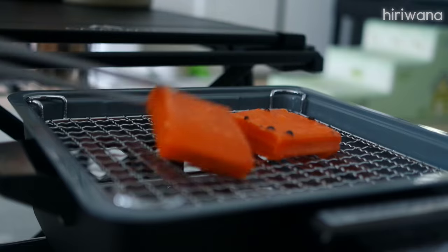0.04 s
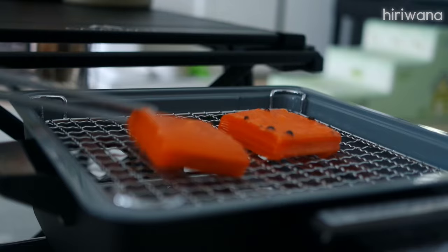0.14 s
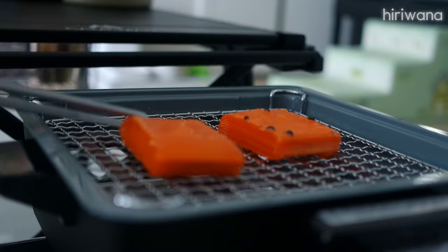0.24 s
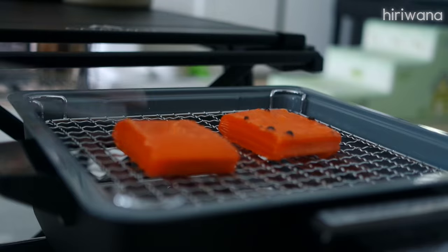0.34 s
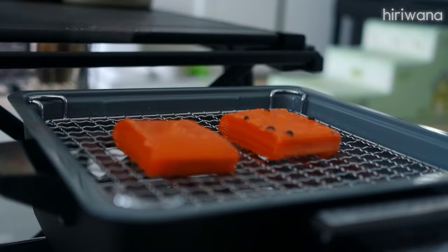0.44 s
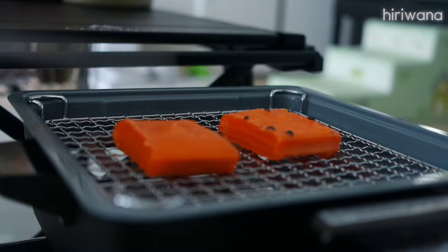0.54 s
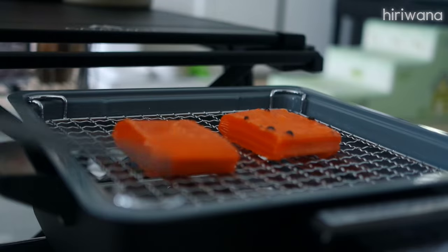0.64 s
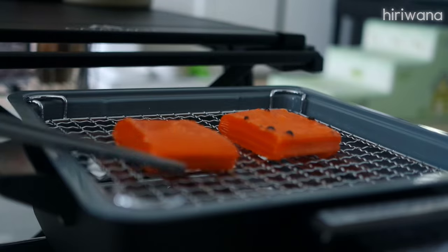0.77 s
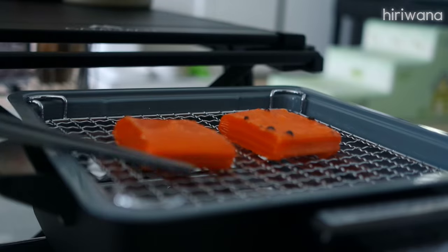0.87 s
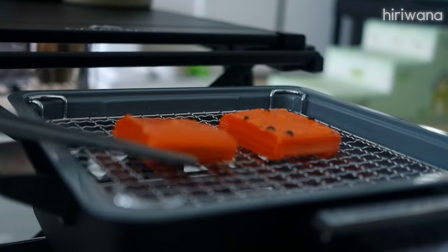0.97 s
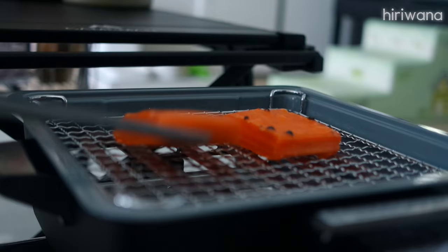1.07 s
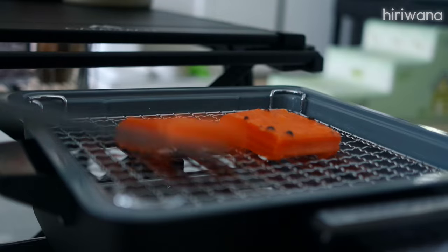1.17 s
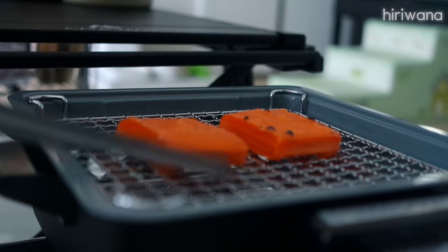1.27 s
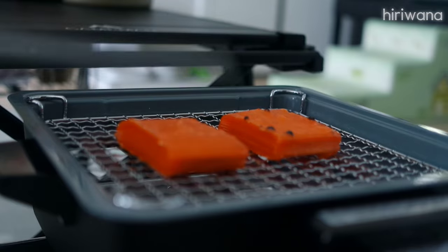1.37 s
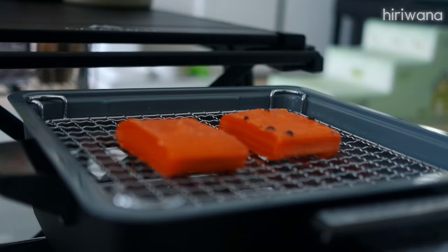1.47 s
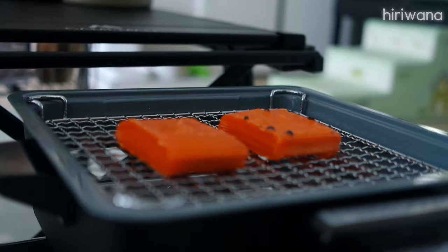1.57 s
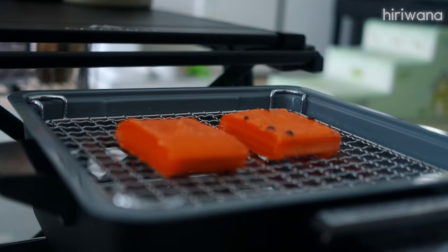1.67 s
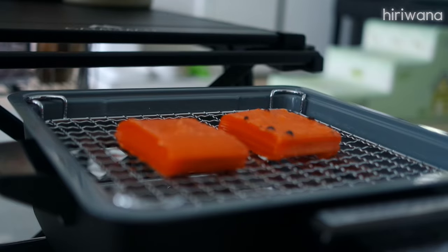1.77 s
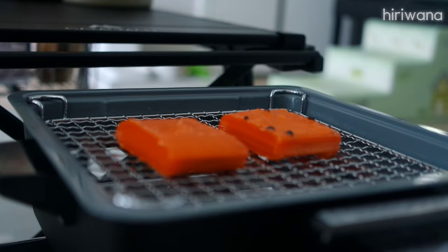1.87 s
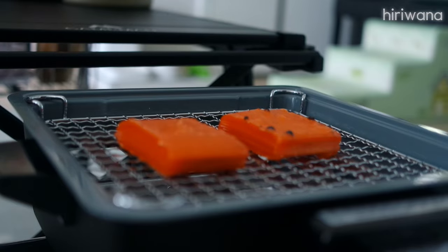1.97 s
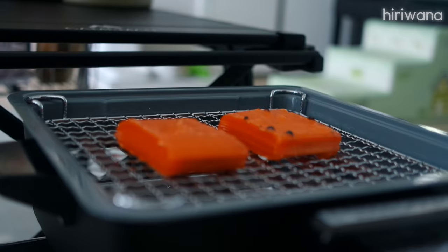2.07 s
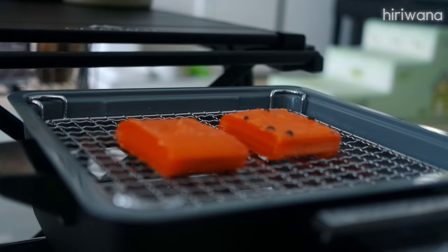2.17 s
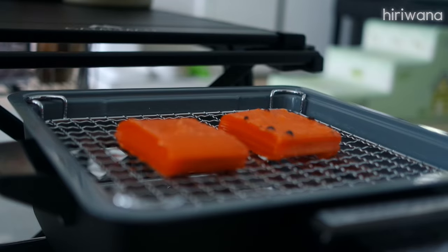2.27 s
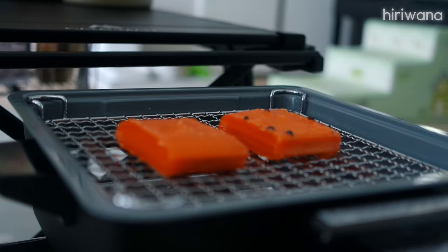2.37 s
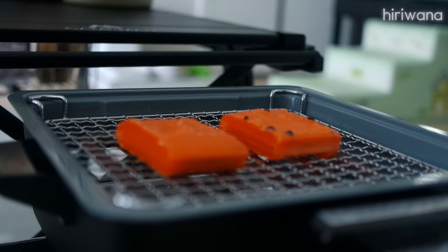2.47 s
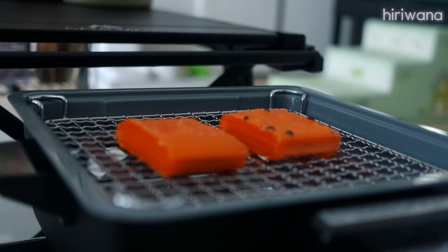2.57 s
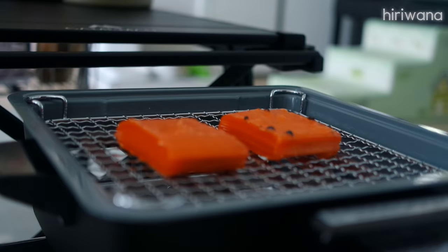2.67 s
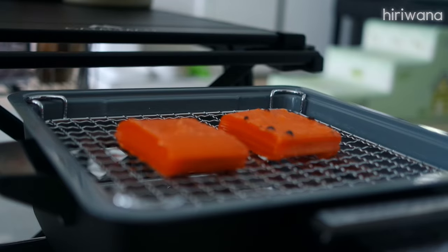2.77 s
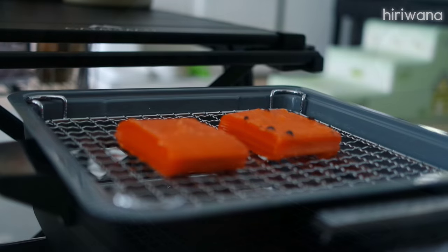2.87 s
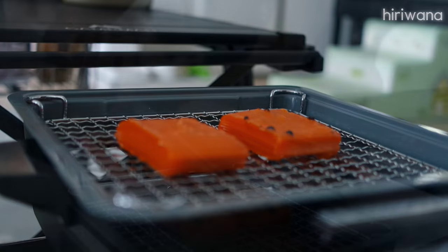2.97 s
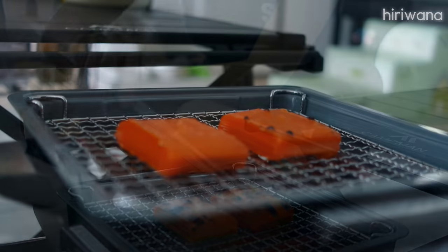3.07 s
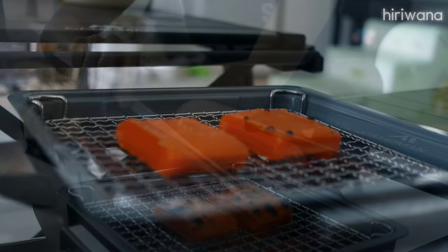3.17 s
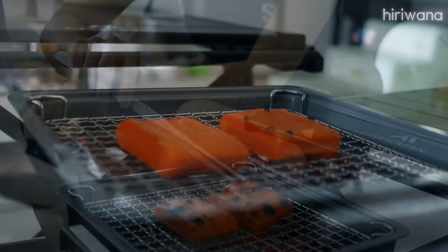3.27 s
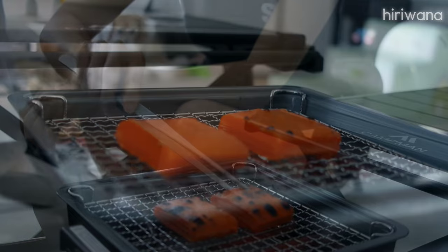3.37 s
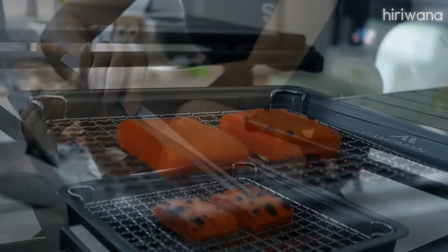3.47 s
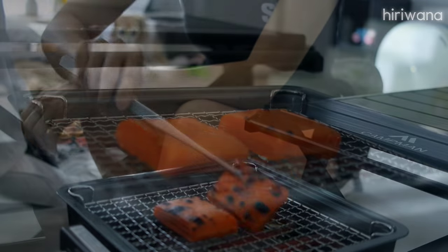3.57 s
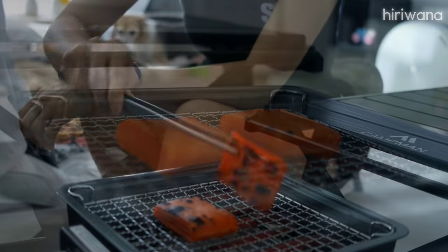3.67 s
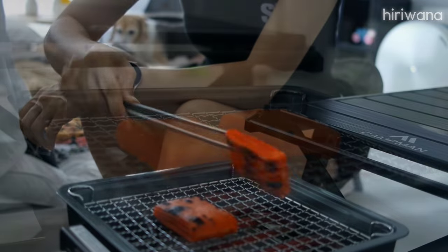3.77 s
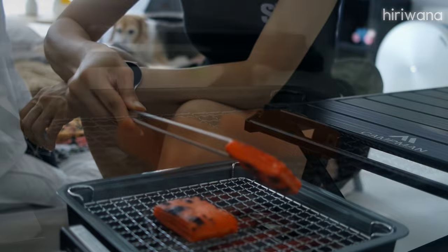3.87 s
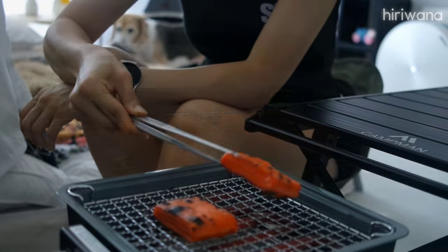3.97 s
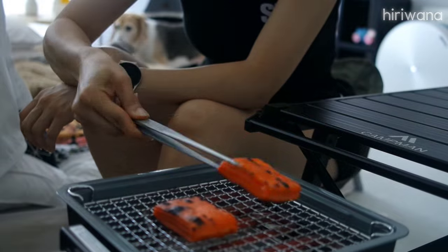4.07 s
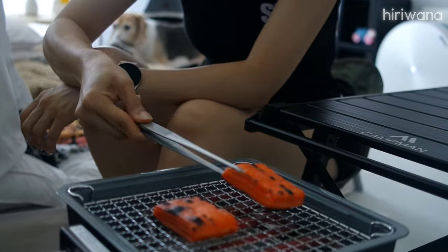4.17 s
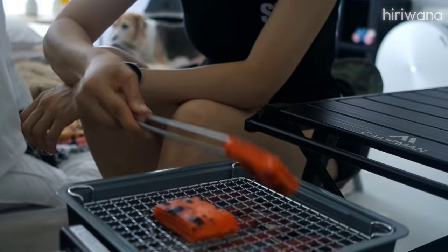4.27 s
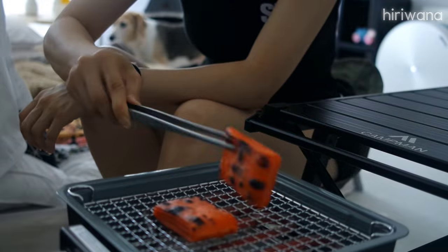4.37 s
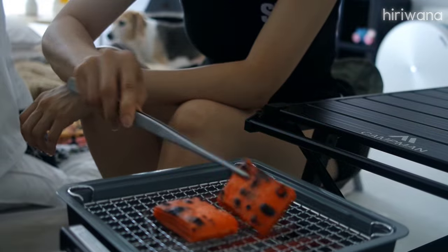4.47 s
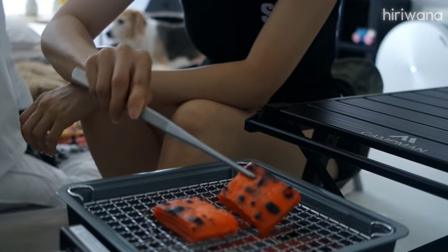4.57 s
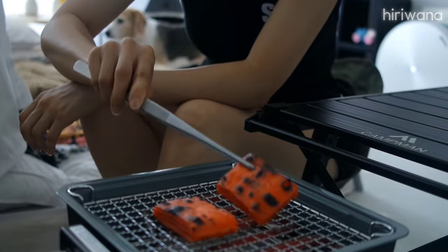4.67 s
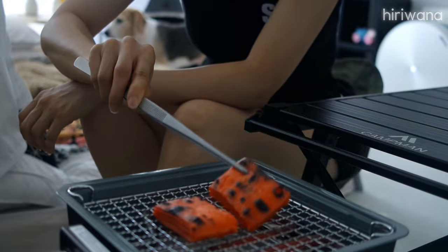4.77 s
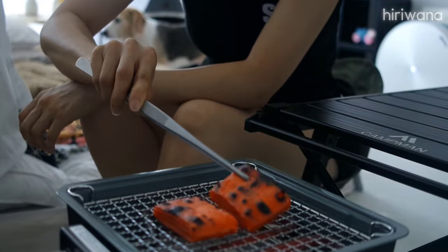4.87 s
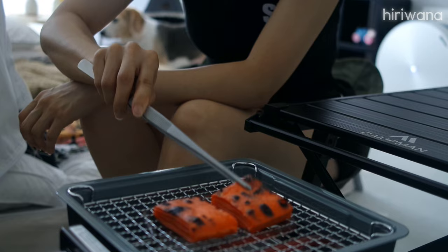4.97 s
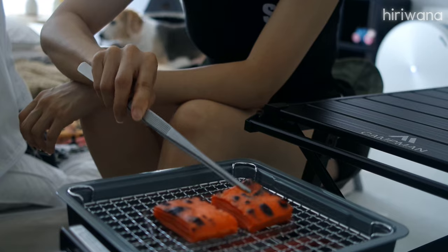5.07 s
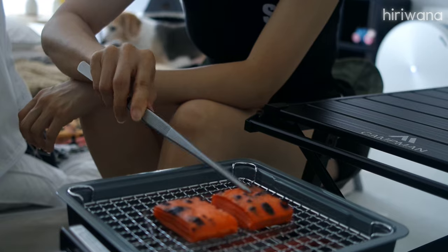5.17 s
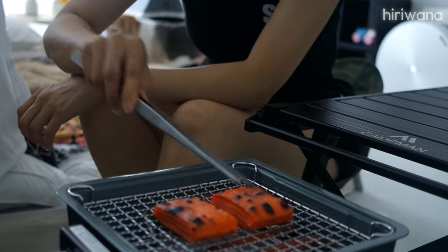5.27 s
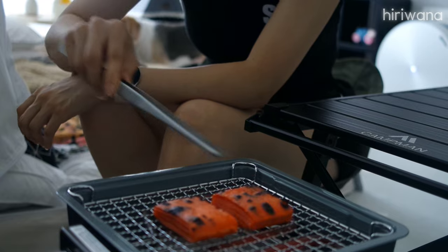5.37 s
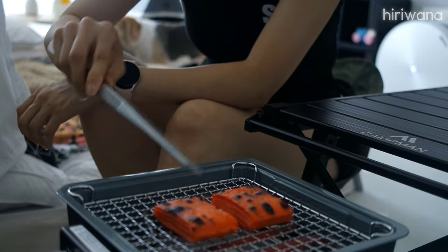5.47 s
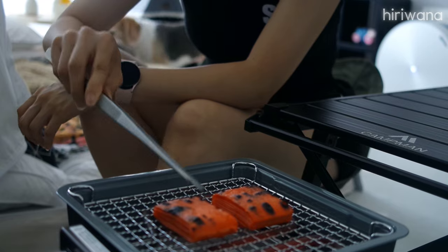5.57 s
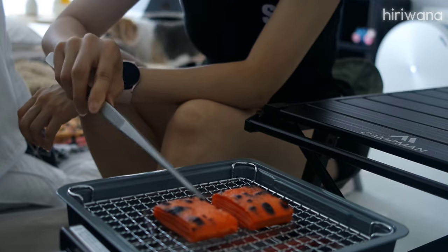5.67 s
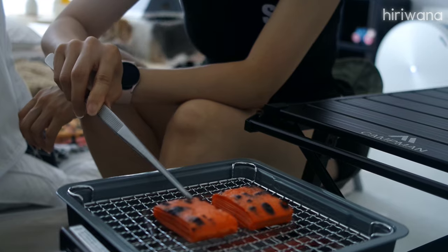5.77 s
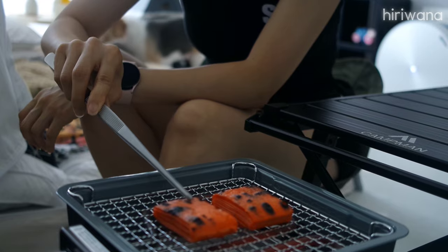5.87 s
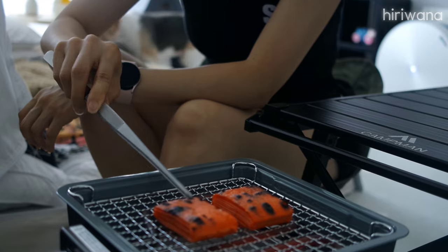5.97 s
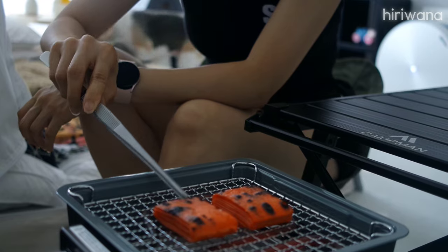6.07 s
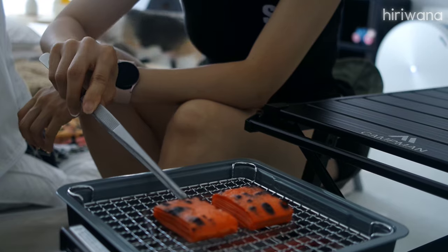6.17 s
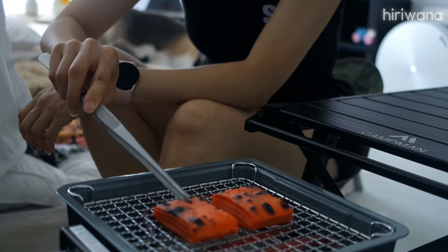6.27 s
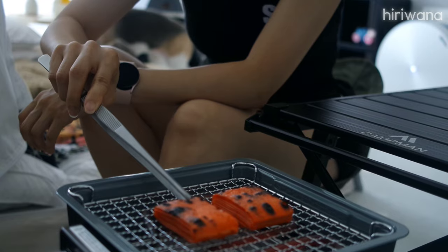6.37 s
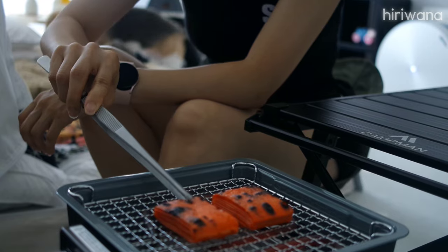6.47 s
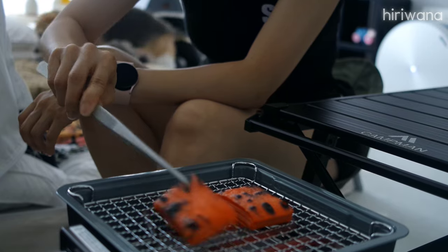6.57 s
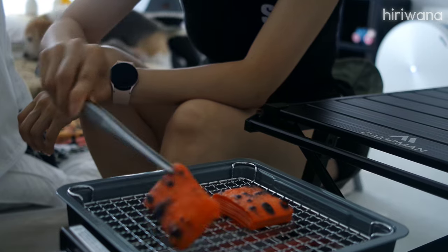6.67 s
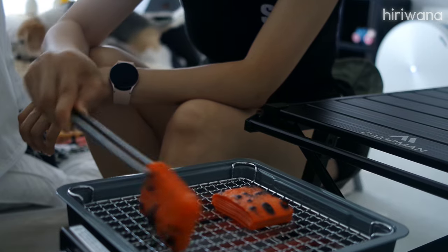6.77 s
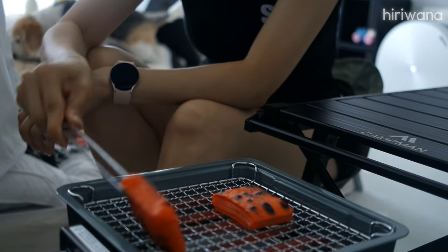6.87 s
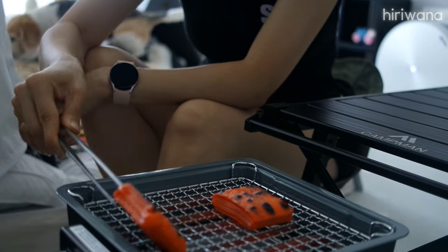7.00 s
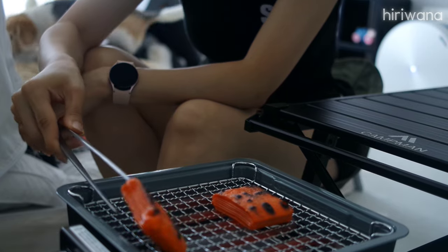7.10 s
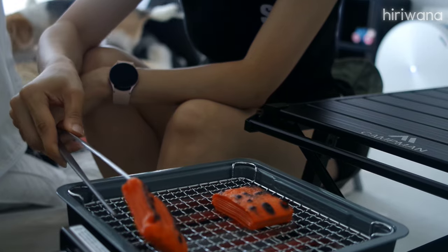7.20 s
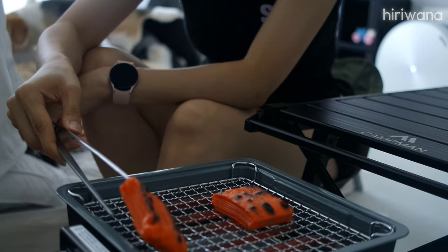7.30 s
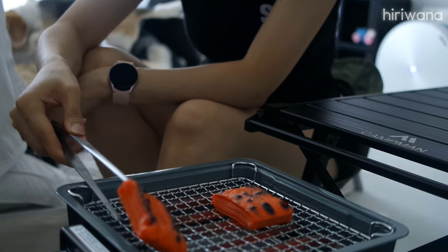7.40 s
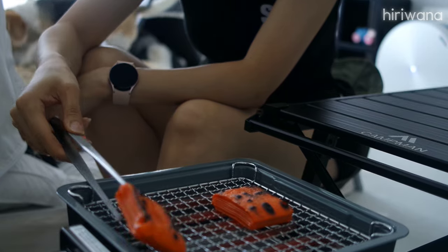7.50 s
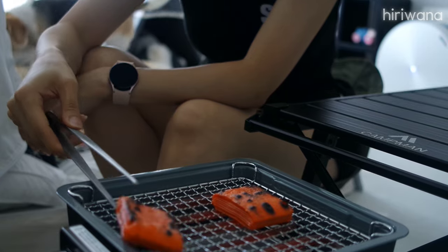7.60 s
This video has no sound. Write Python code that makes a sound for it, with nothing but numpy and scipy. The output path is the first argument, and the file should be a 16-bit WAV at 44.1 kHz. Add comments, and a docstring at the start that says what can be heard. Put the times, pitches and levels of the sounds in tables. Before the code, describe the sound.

A quiet room with faint low hum, airy hiss and very thin high whines; a small tabletop grill is close to the microphone. Barely audible tong touches come first, with soft paired treble puffs fading through the first three seconds. At 0.8 s a hard, tinny knock hits grate and tray, by far the loudest, with smaller knocks until 1.0. At 1.34 s a bright double clack rattles the wires. Only tiny ticks follow until about 3 s, when the background tone shifts. From 3.35 to 3.75 s crisp ticks and knocks cluster, the sharpest near 3.5. Sparse, light wire taps continue from 4.0 to 5.4. Thin blade clicks and pings come around 5.9-6.6, then a quick scrabble at 6.6-6.8 and a final tap at 7.62. Louder contacts briefly lift the background. Distant birds whistle faintly throughout, with quick falling chirps near 6.1-6.3 s.

```python
"""Steel tongs tick and knock on the wire grate of a small tabletop grill in a quiet room.
Knocks sum coloured noise for the rattling wires with damped modes of tin tray and wires;
ticks are noise clicks with a blade ping. Underneath lie hum, hiss and whines (noise and steady sines),
paired treble puffs (swelling noise) and birds (gliding, blurred sines).
A noise expander opens on louder contacts, lifting the whole background, then closes again."""
import sys
import numpy as np
from scipy import signal
from scipy.fft import rfft, irfft, next_fast_len
from scipy.io import wavfile
from scipy.ndimage import uniform_filter1d, map_coordinates

SR = 44100
rng = np.random.default_rng(int(sys.argv[2]) if len(sys.argv) > 2 else 0)


def pcm_store(signal):
    """Save signal as 16-bit PCM."""
    levels = np.round(np.clip(np.atleast_2d(signal), -1, 1) * 32767)
    wavfile.write(sys.argv[1], SR, levels.astype(np.int16).T)


def field_ratio(decibels):
    """Amplitude ratio for a level in dB (20 dB per decade); scalars and array-likes work."""
    return 10 ** (np.asarray(decibels, dtype=float) / 20)


N = 336924

# time over which tones, whines and bird chorus change level: start_s, end_s
CROSSFADE = (2.85, 3.4)


def along(points, hz):
    """Interpolates (Hz, value) points on a logarithmic frequency axis."""
    f, v = np.transpose(points)
    return np.interp(np.log(hz + 1), np.log(f + 1), v)


def unit(x):
    """Normalises by the root mean square, so that rms is 1."""
    return x / np.sqrt(np.mean(x ** 2) + 1e-20)


def wobble(rate):
    """Slow random modulation: a smooth curve through `rate` random knots a second."""
    knots = rng.standard_normal(int(N * rate / SR) + 4)
    return map_coordinates(knots, [np.arange(N) * rate / SR])


def noise(spectrum, n):
    """Spectral shaping: white noise weighted by (Hz, dB) points, scaled to rms 1."""
    m = next_fast_len(n)
    white = rfft(rng.standard_normal(m))
    gain = field_ratio(along(spectrum, np.fft.rfftfreq(m, 1 / SR)))
    return unit(irfft(white * gain, m)[:n])


def steady(hz, db0, db1, shake_db):
    """Pure tone with slight amplitude and phase modulation, cross-faded between two levels."""
    t = np.arange(N) / SR
    later = np.interp(t, CROSSFADE, [0, 1])
    level = ((1 - later) * field_ratio(db0) + later * field_ratio(db1)) * field_ratio(shake_db * wobble(12))
    return level * np.sin(2 * np.pi * hz * t + .6 * wobble(18))  # phase wanders by about 0.6 rad


def room_tone():
    """Stationary background: broadband hum and hiss, slightly unsteady, plus low tones and thin whines."""
    # hum level ahead of the expander: time_s, level_db
    background = [(0, -54.5), (.7, -56.5), (1.5, -54.5), (2.2, -58), (2.9, -56.5), (3.4, -53.5), (4, -55.5),
                  (4.6, -54.5), (5.2, -56), (5.8, -55), (7.64, -56)]
    # relative power density of the hum: hz, density_db
    hum_colour = [(13, -21.5), (22, -8.5), (97, -5.5), (156, -14.5), (190, -10), (211, -8.5), (476, -14),
                  (548, -14.5), (931, -26), (1500, -28), (1950, -65), (3300, -120)]
    # relative power density of the hiss: hz, density_db
    hiss_colour = [(470, -34), (800, 1), (1100, -8.5), (1350, -8), (2130, -6), (2590, -8), (3650, -7),
                   (6170, -15), (13300, -13.5), (14900, -13.5)]
    # low steady tones: hz
    tone_hz = [59, 91.5, 243, 325, 474, 640]
    # levels of those tones: before_crossfade_db, after_crossfade_db
    tone_levels = [(-67, -75), (-72.5, -60), (-77.5, -64.5), (-79.5, -69.5), (-73.5, -69.5), (-78.5, -68.5)]
    # thin whines: hz, before_crossfade_db, after_crossfade_db, unsteadiness_db
    whines = [(2130, -91, -77, 4), (9362, -72.5, -85, 1), (13695, -76.5, -100, 1), (13857, -86, -73, 1)]
    hiss_db = -5.9  # relative to the hum
    t = np.arange(N) / SR
    level_db = np.interp(t, *np.transpose(background))
    hum = field_ratio(level_db + wobble(5)) * noise(hum_colour, N)
    hiss = field_ratio(level_db + hiss_db + 0.37 * wobble(7)) * noise(hiss_colour, N)
    tones = sum(steady(hz, db0, db1, shake_db=3.0) for hz, (db0, db1) in zip(tone_hz, tone_levels))
    return hum + hiss + tones + sum(steady(*whine) for whine in whines)


def in_room(x, wet_db):
    """Reverberation: convolves with noise in which each frequency decays at its own rate."""
    # echo decay of the room: hz, t60_s
    decay = [(300, 0.64), (800, .33), (2000, 0.25), (5500, .28), (14600, 0.2)]
    hz, t, z = signal.stft(rng.standard_normal(len(x)), SR, nperseg=256)
    decaying = z * field_ratio(-60 * t / along(decay, hz)[:, None])
    echo = signal.istft(decaying, SR, nperseg=256)[1]
    echo = echo / np.linalg.norm(echo)
    return x + field_ratio(wet_db) * signal.fftconvolve(x, echo)[:len(x)]


def ring(modes, t, scatter_db, flutter_db=2.2, waver=.6):
    """Modal synthesis: damped sines (Hz, dB, t60 s), new strengths each blow; loose parts flutter and waver."""
    hz, db, t60 = np.transpose(modes)[:, :, None]
    knots = rng.standard_normal((2 * len(hz), 36))
    curves = np.array([np.interp(t, np.linspace(0, t[-1], len(k)), k) for k in knots])
    flutter, drift = np.split(curves, 2)
    db = db + scatter_db * rng.standard_normal(hz.shape) + flutter_db * flutter
    envelope = field_ratio(db - 60 * t / np.clip(t60, .01, 2))
    phase = 2 * np.pi * hz * t + waver * (drift - drift[:, :1])
    return np.sum(envelope * np.sin(phase), axis=0)


def colour(low_db, top_db, hump_db=0):
    """Contact spectrum with the tray's two broad humps, and its size: band powers add."""
    points = [(70, low_db - 20), (250, low_db - 1.5 - 1.5 * hump_db), (620, low_db - 1.4 * hump_db),
              (880, low_db + hump_db), (1200, low_db - hump_db), (1750, low_db - hump_db),
              (2200, low_db + hump_db), (3100, low_db - 1.5), (4000, -1.6), (7500, .4 * top_db - 1.5),
              (11500, top_db + 0.5), (13500, top_db + 5), (16000, top_db - 3.5)]
    return points, np.sqrt(1 + field_ratio(2 * low_db) + field_ratio(2 * top_db))


def lift(s, hz):
    """Selective excitation: dB added around the tones favoured by the knock at s, if it has any."""
    # tones of tray or grate that stand out (or recede): knock_s, hz, lift_db
    favoured = [(.9461, 870, 7), (.9461, 1280, -10), (.9461, 1890, 11), (1.003, 875, 11), (1.3568, 1892, 4),
                (3.5074, 1400, 3), (3.5833, 1500, 10), (4.159, 11500, 5), (4.6342, 1420, 11),
                (4.659, 5650, 8), (5.049, 4250, 5), (6.6876, 4200, 3)]
    width_octaves = .16
    total_db = np.zeros(len(hz))
    for at, tone_hz, db in favoured:
        if abs(at - s) < .006:
            octaves = np.log2(np.divide(hz, tone_hz))
            total_db = total_db + db * np.exp(-(octaves / width_octaves) ** 2)
    return total_db


def knocks():
    """Impact excitation: the strike place decides which tray modes ring and how the wires rattle."""
    # knocks and drags on the grate: start_s, level_db, tray_db, top_treble_db, place (0 rim, 1 middle)
    blows = [(.0994, -58, 11.5, -33, .9), (.7945, -12, 6.5, -7, .09), (.9461, -41.5, 12, -15, .2),
             (1.004, -59, 22, -12.5, .2), (1.339, -21.5, 6, -4, .95), (1.3568, -28, 7, -4, .95),
             (3.0713, -50, 3, -6, .6), (3.5074, -39, 9.5, -10, .5), (3.5404, -41.5, 5, 8.5, .8),
             (3.582, -40.5, 12.5, -2, .68), (3.6425, -36, 4, -4, .5), (3.7318, -57, 7, 7.5, .4),
             (4.0494, -54, -14, 3.5, .67), (4.159, -44.5, -30, 4.5, .6), (4.292, -50.5, -17, -1.5, .57),
             (4.5141, -55, -14.5, -14, .6), (4.6332, -49, 12, -16, .6), (4.6475, -53, 12, -16, .35),
             (4.659, -45, -1, -7, .7), (5.049, -42, -16, -4, .6), (5.2743, -55, -6, 8, .6),
             (5.4205, -50.5, -21, 0, .68), (6.652, -50, 0, 3, .6), (6.6876, -41, -1, -3, .6),
             (6.715, -44.5, -2, -3, .6), (6.7494, -48.5, -4, 3, .6), (6.7794, -51, 4, 2.5, .73),
             (6.8194, -53, 6.5, 3, .6), (7.6225, -41, 1, 8.5, .35)]
    # modes of tin tray and grate: hz
    tray_hz = [470, 640, 770, 870, 900, 976, 1098, 1280, 1477, 1665, 1780, 1892, 2035, 2085, 2150, 2225,
               2500, 2650, 2700, 3027, 3290, 3735, 5378]
    # strength and decay of those modes: rim_db, middle_db, t60_s
    tray_modes = [(-20, 2, 0.09), (-22, -13, .1), (-14, -5, .07), (-7, -16, 0.17), (8, -17, 0.03),
                  (-7.5, -10, 0.086), (-12, -4, 0.13), (-3, -11, .13), (-8, -8, .12), (-9, -16, 0.09),
                  (-22, -6, .09), (-18, 1, 0.14), (-10, -14, .12), (-6, -20.5, 0.09), (16, -11, .028),
                  (-6, -18, 0.1), (-12, -14, 0.12), (-6, -11, 0.07), (-15.5, -18, 0.21), (-7, -20, 0.11),
                  (-21, -16, .12), (-18, -14.5, 0.12), (-13, -20, 0.06)]
    # single wires of the grate: hz, level_db, t60_s
    wire_modes = [(4180, 0, .12), (4340, 0, .12), (5800, -1, .1), (7900, 0, .12), (8450, -2, .12),
                  (10350, 0, .12), (11850, 0, .11), (13280, -1, .1)]
    rattle_rim_s, rattle_middle_s = .11, .19  # t60 of the rattle with tray_db at 0
    rattle_s_per_tray_db = -.003  # a drag that leaves the tray quiet rattles longer
    wires_db, wires_per_tray_db = -20, -.22  # such drags also pluck the wires more
    hard_db, dull_per_db = -10, .2  # softer than hard_db: tilt in dB an octave for each dB
    rise_rim_s, rise_middle_s = .0016, .008  # the springy middle takes a blow slowly
    out, t = np.zeros(N + SR), np.arange(SR // 4) / SR
    rim_db, middle_db, tray_t60 = np.transpose(tray_modes)
    wire_hz, wire_db, wire_t60 = np.transpose(wire_modes)
    grid = np.geomspace(40, 20000, num=200)
    knot_t = t[::SR // 300]
    for s, db, tray_db, top_db, place in blows:
        place = np.clip(place, 0, 1)
        points, size = colour(tray_db - 4, top_db, hump_db=6 * (1 - place))
        points = np.c_[grid, along(points, grid) + lift(s, grid)]

        # the wires tap unevenly
        chatter = field_ratio(3 * np.interp(t, knot_t, rng.standard_normal(len(knot_t))))
        t60 = rattle_rim_s + (rattle_middle_s - rattle_rim_s) * place + rattle_s_per_tray_db * tray_db
        decay = field_ratio(-60 * t / np.clip(t60, .003, .5))
        rattle = field_ratio(-7.5) * size * chatter * noise(points, len(t)) * decay

        # soft blows tilt the tray's modes about 1200 Hz towards the low ones
        dull_db = dull_per_db * min(db + tray_db - hard_db, 0) * np.log2(np.divide(tray_hz, 1200))
        mode_db = (1 - place) * rim_db + place * middle_db + dull_db + lift(s, tray_hz)
        modes = np.c_[tray_hz, mode_db, tray_t60]
        rings = field_ratio(tray_db - 9.5) * ring(modes, t, scatter_db=1.2) * (1 - np.exp(-t / 0.0015))

        plucked = np.c_[wire_hz, wire_db + along(points, wire_hz), wire_t60]
        wires = field_ratio(wires_db + wires_per_tray_db * tray_db) * ring(plucked, t, scatter_db=3.0)

        rise = rise_rim_s + (rise_middle_s - rise_rim_s) * place ** 4
        swell = 1 - np.exp(-t / np.clip(rise, .0002, .02))
        blow = in_room(swell * (rattle + wires + rings / 2), wet_db=-6.5)
        blow = blow + swell * rings / 2  # the tray is heard mostly direct
        out[round(s * SR):][:len(t)] += field_ratio(db) * blow
    return out[:N]


def ticks():
    """Brief contact: a fast-decaying noise click; where the tips meet each other the blades ping as modes."""
    # light ticks of the tong tips: start_s, level_db, top_treble_db, blade_ring_db
    taps = [(.158, -53, 5, -22), (.4378, -53, 8, -26), (.7945, -12, 2, -26), (.821, -30, 6.5, -24),
            (1.1972, -51.5, -15, -29), (1.338, -20.5, 19, -11), (1.3568, -28, 21, -9.5),
            (1.3703, -33.5, 19, -8.5), (1.5947, -56, -8, -26), (1.7998, -55, -12, -29),
            (2.657, -49, -11, -27.5), (2.828, -50, -18, -32), (3.3432, -50, -2, -25.5),
            (3.3861, -47, 5, -17), (3.4261, -50, -15, -30), (3.4964, -63, 20.5, 5), (3.5068, -23, 15, -22),
            (3.5319, -23, 15.5, -8), (5.8634, -48, -29, -20.5), (5.918, -43.5, -8, -28),
            (6.1154, -59, 6, 2), (6.1266, -53, 2.5, 11), (6.1558, -53, 7, -2), (6.308, -45.5, -6.5, -20),
            (6.363, -47, -34, -30), (6.584, -54, 5, -7.5), (6.6194, -63, 12, 11), (6.6588, -41, 15, 2),
            (7.3661, -53.5, 4.5, -5), (7.56, -50.5, -14, -24), (7.6235, -44, 12, 0)]
    # modes of the tong blades: hz, level_db, t60_s
    blades = [(11100, -1, .07), (11200, -3, .07), (12800, -3, .05), (12880, -3, .05), (14450, -2, .05),
              (14600, -2, .05)]
    t60_s, s_per_db = .018, -.0003  # decay of a tick at -50 dB; harder ones are shorter
    out, t = np.zeros(N + SR), np.arange(SR // 5) / SR
    for s, db, top_db, blade_db in taps:
        points, size = colour(-3.5, top_db)
        decay = field_ratio(-60 * t / np.clip(t60_s + s_per_db * (db + 50), .004, .05))
        click = field_ratio(-2.5) * size * noise(points, len(t)) * decay
        ping = field_ratio(blade_db - 9) * ring(blades, t, scatter_db=2)
        tick = (1 - np.exp(-t / 0.00045)) * (click + ping)
        tick = tick + field_ratio(-6.5) * np.pad(tick, (125, 0))[:len(t)]  # reflection off the tabletop
        out[round(s * SR):][:len(t)] += field_ratio(db) * in_room(tick, wet_db=-11)
    return out[:N]


def puffs():
    """Amplitude-modulated noise: soft Gaussian puffs high in the treble, in four even pairs that fade."""
    first_s, every_s, gap_s = .2, .8, .155  # first puff, spacing of pairs, gap within a pair
    level_db, fade_db_per_s, second_db = -58, 3, -1.5  # second_db: second puff relative to first
    t = np.arange(N) / SR
    shape = np.zeros(N)
    for pair in range(4):
        for second in range(2):
            s = first_s + every_s * pair + gap_s * second
            db = level_db - fade_db_per_s * s + second_db * second
            shape += field_ratio(db) * np.exp(-((t - s) / 0.043) ** 2)
    treble = [(3000, 9), (7000, 5), (11000, 3.5), (13000, 10), (15000, 2), (16000, -27)]
    return shape * noise(treble, N)


def note(length, hz0, hz1, blur_hz):
    """Narrow-band modulation: a gliding whistle, blurred by distance and echoes into a fluttering band."""
    u = np.linspace(0, 1, round(length * SR))
    knots = rng.standard_normal((2, int(length * blur_hz) + 4))
    a, b = (map_coordinates(k, [u * length * blur_hz]) for k in knots)
    a = a + 60 / blur_hz  # the less blur, the steadier the whistle
    phase = 2 * np.pi * np.cumsum(hz0 + (hz1 - hz0) * u) / SR
    envelope = (1 - np.exp(-u / 0.034)) * np.sqrt(1 - u)
    return envelope * (a * np.sin(phase) + b * np.cos(phase))


def birds():
    """Superposed far sources: a few clear notes over a faint chorus at chance times and pitches."""
    # clear far notes: start_s, length_s, start_hz, blur_hz, level_db (relative to near_db)
    clear_notes = [(2.07, .3, 3900, 400, 0), (2.78, .44, 7300, 250, -8), (2.87, .09, 6550, 120, -8),
                   (2.92, .28, 3850, 200, 1), (3.25, .22, 2150, 350, 0), (3.27, .17, 3230, 200, 1),
                   (4.36, .2, 3170, 150, -2), (4.66, .16, 4005, 45, -2), (4.76, .3, 3650, 200, -4),
                   (5.32, .13, 3650, 80, 2), (5.47, .3, 3256, 50, -4), (5.78, .1, 4025, 120, -1),
                   (6.12, .25, 3700, 700, -2), (6.1, .3, 5700, 1200, -3), (6.4, .25, 3840, 300, 0),
                   (7.03, .12, 5680, 200, -7), (7.29, .15, 3920, 120, 0)]
    near_db, chorus_db, count = -67, -79, 90
    sag_per_blur = .25  # the more blurred a note, the further it slides down
    out = np.zeros(N + SR)
    chorus = []
    for a, b, c, d in rng.random((count, 4)):
        s = N / SR * a
        later_db = np.interp(s, CROSSFADE, [-1, 3.5])  # the chorus is nearer after the cross-fade
        db = chorus_db - near_db + 6 * d + later_db
        chorus.append((s, 0.12 + 0.13 * b, 3000 + 1250 * c, 100 + 200 * b, db))
    for s, length, hz, blur_hz, db in clear_notes + chorus:
        call = note(length, hz, hz - sag_per_blur * blur_hz, blur_hz)
        out[round(s * SR):][:len(call)] += field_ratio(near_db + db) * call
    return out[:N]


def chirps():
    """Frequency sweep: quick falling chirps of two nearer birds, growing as they fall, smeared by echoes."""
    # chirps: start_s, start_hz, end_hz, level_db
    falls = [(6.075, 6500, 5150, -64), (6.162, 6600, 5150, -61), (6.255, 6400, 5150, -61),
             (6.112, 4600, 3450, -65), (6.19, 4200, 3150, -65), (6.235, 4100, 3200, -66)]
    length_s = .048
    out, u = np.zeros(N + SR), np.linspace(0, 1, round(length_s * SR))
    envelope = field_ratio(8 * (u - 1)) * np.sqrt(np.sin(np.pi * u).clip(0))
    for s, start_hz, end_hz, db in falls:
        pitch_hz = end_hz + (start_hz - end_hz) * (1 - u) ** 1.4
        call = envelope * np.sin(2 * np.pi * np.cumsum(pitch_hz) / SR)
        call = in_room(np.pad(call, (0, SR // 5)), wet_db=5)
        out[round(s * SR):][:len(call)] += field_ratio(db) * call
    return out[:N]


def scene():
    """Superposition: all sources add at one microphone."""
    return (knocks() + ticks() + room_tone() + birds() + chirps() + puffs())[None]


def expander(x, open_db=-47, slope=1.0, depth_db=13, fall_db=110):
    """Downward expansion: quiet sound is turned down; the sensed level jumps up, then sinks fall_db a second."""
    bass_cut = signal.butter(2, 400, "high", fs=SR, output="sos")
    sensed = signal.sosfilt(bass_cut, x)
    power = np.abs(uniform_filter1d(sensed ** 2, size=441))  # mean over 10 ms
    level = 10 * np.log10(power + 1e-12)
    sink = fall_db * np.arange(N) / SR
    held = np.maximum.accumulate(level + sink, axis=1) - sink
    return x * field_ratio(np.clip(slope * (held - open_db), -depth_db, 0))


def top_cut(x):
    """Nothing passes above the cut-off."""
    return signal.sosfilt(signal.butter(12, 16400, fs=SR, output="sos"), x)


def record(dry):
    """Dynamics and band limiting: the expander, then a steep low-pass, 62 dB down from 15600 Hz."""
    edge = signal.cheby2(14, 62, 15600, fs=SR, output="sos")
    mix = signal.sosfilt(edge, expander(dry))
    return top_cut(mix)


dry = scene()
out = record(dry)
pcm_store(out)
```